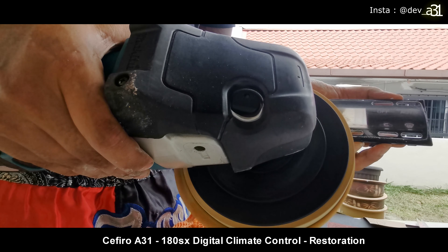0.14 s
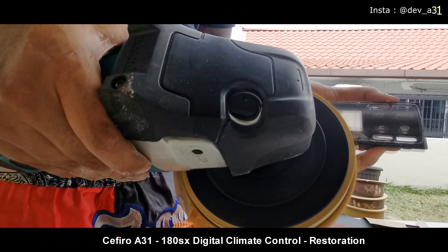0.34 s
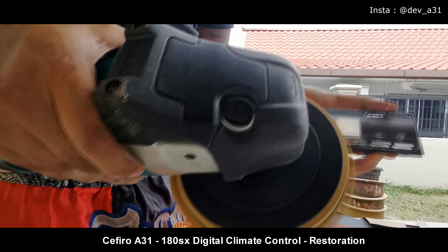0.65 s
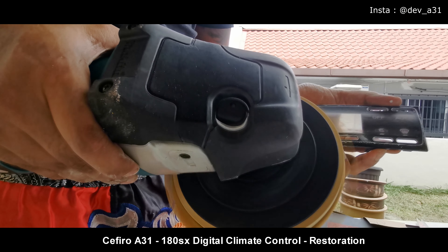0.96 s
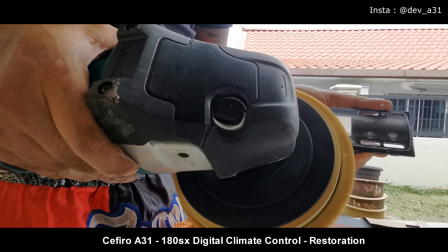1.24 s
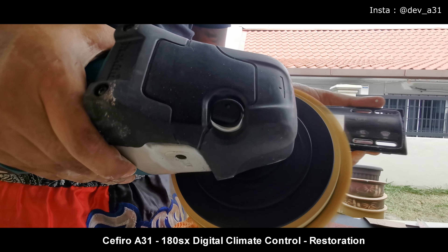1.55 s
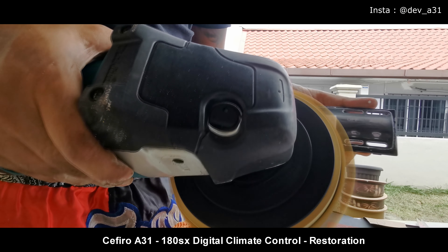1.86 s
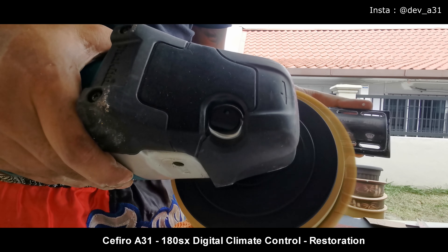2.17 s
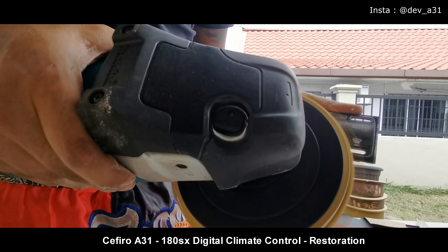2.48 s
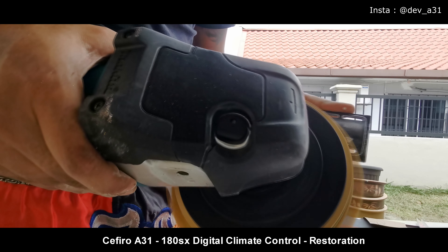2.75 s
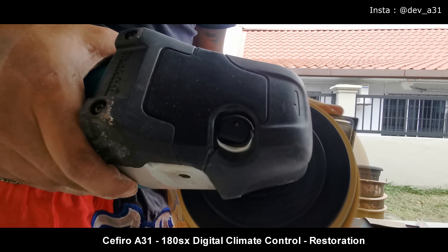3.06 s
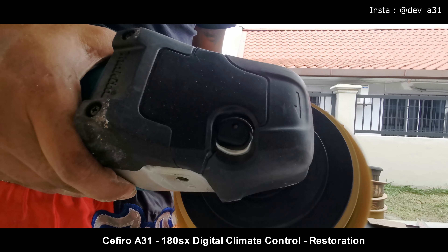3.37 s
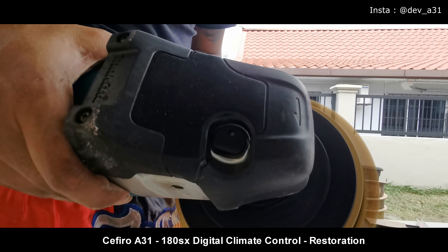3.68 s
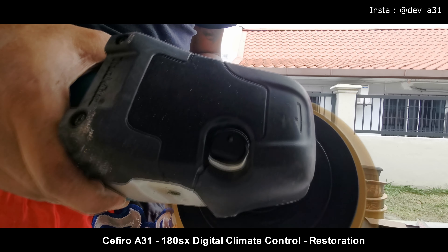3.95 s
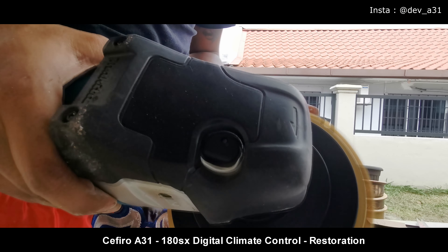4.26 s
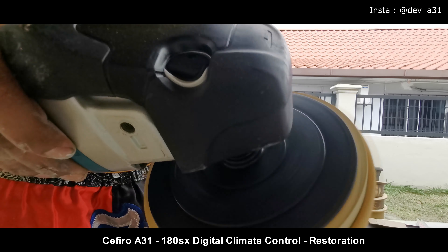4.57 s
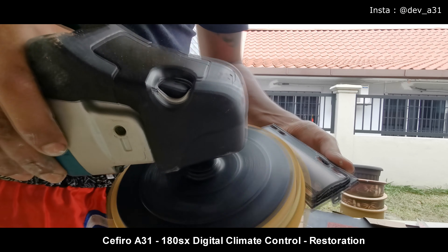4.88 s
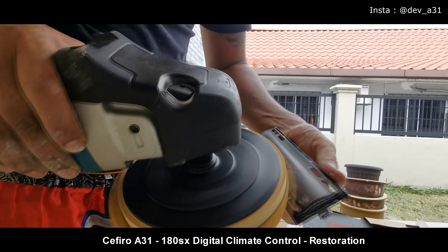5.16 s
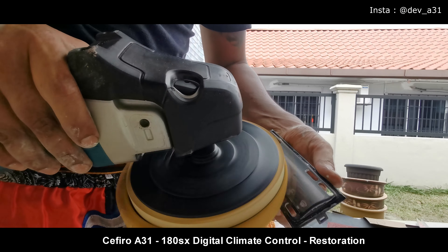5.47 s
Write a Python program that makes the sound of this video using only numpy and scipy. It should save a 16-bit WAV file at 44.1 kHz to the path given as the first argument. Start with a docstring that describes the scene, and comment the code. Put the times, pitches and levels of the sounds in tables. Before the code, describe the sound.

Heard very close in the open air, a rotary polisher runs throughout, mixing a high motor whine, a buzzing gear rattle and a sharp fan hiss above a faint hum. The pitch wavers a little as the pad presses on plastic. Near the middle the tool is raised for a moment, leaving mostly hiss and a slightly higher whine, then the rattle returns and the polishing carries on evenly.

```python
"""Outdoors, a hand's width from an electric rotary polisher buffing a plastic panel.
Under load its bevel gear sings and rattles in the gear head. The commutator whines,
the fan hisses through the vents and the shaking body drones. Midway the pad is lifted:
the motor speeds up, the gear falls quiet, and the tool comes down again tilted."""
import sys
import numpy as np
from scipy import signal
from scipy.fft import rfft, irfft, next_fast_len
from scipy.io import wavfile
from scipy.ndimage import uniform_filter1d

SR = 44100
rng = np.random.default_rng(int(sys.argv[2]) if len(sys.argv) > 2 else 0)


def inscribe(sig):
    """Save sig as 16-bit PCM at rate SR to the path in sys.argv[1].

    A 1-D sig is mono; a 2-D sig holds one channel per row.
    Samples are clipped to [-1, 1] before scaling.
    """
    pcm = np.round(np.clip(np.atleast_2d(sig).T, -1, 1) * 32767)
    wavfile.write(sys.argv[1], SR, pcm.astype(np.int16))


N = 429093
TIME_S = np.arange(N) / SR
PINION_TEETH, GEAR_RATIO, COMMUTATOR_BARS = 6, 8.65, 24
MAINS_HZ, WORKING_RPS = 50, 82   # rps: motor turns per second


def from_db(db):
    """Decibels to amplitude."""
    return 10 ** (np.asarray(db) / 20)


def unit_rms(x):
    """Scale to rms 1."""
    return x / np.sqrt(np.mean(np.abs(x) ** 2) + 1e-20)


def curve(rows):
    """(time, value) rows interpolated to every sample."""
    return np.interp(TIME_S, *np.transpose(rows))


def drift(corner_hz):
    """Slow noise of rms 1: coarse draws through a double one-pole low-pass."""
    step, warmup = 40, 2000
    pole = np.exp(-2 * np.pi * corner_hz * step / SR)
    white = rng.standard_normal(N // step + warmup + 2)
    slow = signal.lfilter([1], [1, -2 * pole, pole * pole], white)[warmup:]
    return np.interp(np.arange(N) / step, np.arange(len(slow)), unit_rms(slow))


def coloured(white, spectrum, column):
    """White noise shaped to one density column of a spectrum."""
    size, spectrum = next_fast_len(N), np.array(spectrum)
    hz = np.maximum(np.fft.rfftfreq(size, 1 / SR), 1)
    gain = from_db(np.interp(np.log(hz), np.log(spectrum[:, 0]), spectrum[:, column]))
    gain *= np.minimum(hz / spectrum[0, 0], 1) ** 2
    return irfft(rfft(white, size) * gain, size)[:N] * np.sqrt(SR / 2)


def ring(drive, hz, width_hz):
    """Steep-skirted resonance; complex, rms 1."""
    pole = np.exp((-np.pi * width_hz + 2j * np.pi * hz) / SR)
    return unit_rms(signal.lfilter([1], [1, -2 * pole, pole * pole], drive + 1e-18))


def phasor(cycles):
    """Complex sine of amplitude 1."""
    return np.exp(2j * np.pi * cycles)


# Tool shake and pad-stirred air: (frequency [Hz], left [rel. dB/Hz], right [rel. dB/Hz])
RUMBLE_SPECTRUM = [(25, -75, -77), (40, -73, -68), (55, -68, -66), (75.4, -76, -70.5), (96, -63.5, -66.5),
                   (119, -75, -68.5), (162, -70, -69.5), (300, -76, -72), (447, -78, -76.5),
                   (700, -86, -85.5)]
# Body drones: (frequency [Hz], width [Hz], level [dB])
BODY_DRONES = [(53, 14, -59), (92.4, 19, -59), (165, 31, -61.5), (244, 23, -61), (389, 17, -56.5)]
# Hums that swell and fade: (time [s], length [s], frequency [Hz], level [dB])
HUM_SWELLS = [(.3, 1, 165, -50.5), (.6, 1, 214.5, -48.5), (2.1, 0.79, 208, -49.5), (2.175, 0.34, 89, -43),
              (3.55, 0.84, 162, -50.5), (4.364, 0.17, 138, -41.5)]


def body(spread, rumble_db):
    """The shaking tool drones over a soft rumble, mostly common to both channels."""
    mid, side = rng.standard_normal((2, N))
    left = coloured(mid + spread * side, RUMBLE_SPECTRUM, column=1)
    right = coloured(mid - spread * side, RUMBLE_SPECTRUM, column=2)
    drones = np.zeros(N)
    for hz, width_hz, db in BODY_DRONES:
        drones += from_db(db) * ring(rng.standard_normal(N), hz, width_hz).real
    for at_s, length_s, hz, db in HUM_SWELLS:
        swell = np.exp(-2 * ((TIME_S - at_s) / length_s) ** 2)
        drones += from_db(db) * swell * ring(rng.standard_normal(N), hz, width_hz=18.4).real
    return from_db(rumble_db) * np.array([left, right]) + np.sqrt(2) * drones


# Vent resonances: (upright [Hz], tilted [Hz], width [Hz], upright [dB], tilted [dB], bright change [dB])
VENT_RESONANCES = [(11040, 10640, 660, -24.5, -25.3, -2), (12950, 12130, 700, -32.5, -42, 8.5)]
# Spells of brighter hiss: (start [s], end [s])
BRIGHT_SPELLS = [(4.45, 5), (7.15, 8.5)]


def vent_jets(tilt, wander_hz=59.9, swing_hz_s=220, wander_db=0.4, fade_s=0.17):
    """Air sings at the vent slots in noise bands that swing while the tool is being tilted."""
    bright = sum(np.clip(np.minimum(TIME_S - start_s, end_s - TIME_S) / fade_s + 0.5, 0, 1)
                 for start_s, end_s in BRIGHT_SPELLS)
    tilt_per_s = uniform_filter1d(np.abs(np.gradient(tilt)) * SR, size=SR // 10)
    base_hz, jets = 1000, np.zeros(N)
    for upright_hz, tilted_hz, width_hz, upright_db, tilted_db, bright_db in VENT_RESONANCES:
        hz = upright_hz + (tilted_hz - upright_hz) * tilt
        hz += wander_hz * drift(0.7) + swing_hz_s * tilt_per_s * drift(3)
        db = upright_db + (tilted_db - upright_db) * tilt + bright_db * bright + wander_db * drift(0.7)
        band = ring(rng.standard_normal(N), base_hz, width_hz)
        shifted = band * phasor(np.cumsum(hz - base_hz) / SR)
        jets += from_db(db) * unit_rms(shifted.real)
    return jets


# Cooling air: (frequency [Hz], left [dB/Hz], right [dB/Hz])
RUSH_SPECTRUM = [(250, -100, -86), (570, -65, -86), (785, -74.5, -91), (950, -87, -72.5),
                 (1490, -70.5, -79), (2330, -65.5, -69.5), (3270, -72.5, -76.5), (5000, -67.5, -73.5),
                 (7200, -69, -66.5), (7400, -71, -67), (8400, -76, -83.5), (10550, -65, -81.5),
                 (12500, -79, -76), (15000, -71.5, -93)]
# Vent and brush hiss: (frequency [Hz], upright [rel. dB/Hz], tilted [rel. dB/Hz])
HISS_SPECTRUM = [(7300, -104, -92), (7960, -62, -66), (8530, -65.5, -60), (9130, -58, -60.5),
                 (9400, -62, -59.5), (9530, -57.5, -56.5), (10100, -60.5, -60.5), (10500, -57.5, -63),
                 (11200, -58, -56.5), (12000, -59.5, -55.5), (12500, -59.5, -57), (13250, -61.5, -60),
                 (13900, -70, -67), (15800, -75, -72)]


def fan(turns, speed_rps, tilt, hiss_db, flutter_db, chop_db):
    """Cooling air rushes broadly; the vents beam a hiss to the left that grows with motor speed."""
    white = rng.standard_normal((4, N))
    air = np.array([coloured(white[0], RUSH_SPECTRUM, column=1),
                    coloured(white[1], RUSH_SPECTRUM, column=2)])
    hiss = np.sqrt(1 - tilt) * coloured(white[2], HISS_SPECTRUM, column=1)
    hiss += np.sqrt(tilt) * coloured(white[3], HISS_SPECTRUM, column=2)
    flow_gain = (speed_rps / speed_rps.mean()) ** 3
    air[0] += flow_gain * (from_db(hiss_db) * hiss + vent_jets(tilt))
    return air * from_db(flutter_db * drift(28) + chop_db * phasor(turns).real)


def reflections(direct, tilt, echo_db, tilt_stretch, sway):
    """Short echoes off hand, panel and housing comb the hiss differently as the tool moves."""
    samples, out, echo_gain = np.arange(N), direct.copy(), from_db(echo_db)
    for channel, path_scale in enumerate((1, 8 / 7)):
        for base_s in (0.0013, 0.0022, 0.0031, 0.0046):
            delay_s = base_s * path_scale * (1 + tilt_stretch * tilt + sway * drift(0.2))
            echo = np.interp(samples - np.round(delay_s * SR), samples, direct[channel])
            out[channel] -= echo_gain * echo
    return out / np.sqrt(1 + 4 * echo_gain ** 2)


# Whine: (bar-rate harmonic, upright [rel. dB], tilted [rel. dB], lifted [rel. dB],
# slack slope [dB/rps], right offset [dB])
WHINE_HARMONICS = [(1, -39.5, -42, -36.5, 7, -12.5), (2, -37, -46, -38, -0.5, -7.5),
                   (3, -48.5, -49.5, -50, -3, -3.5)]
# Thin whistle at 4 x bar rate: (time [s], level [rel. dB])
WHISTLE_LEVEL = [(0, -42), (1.34, -47), (1.9, -58), (4.1, -60), (4.48, -33.5), (5.6, -57), (7.07, -57),
                 (7.3, -44), (8.2, -41), (8.6, -58), (9.73, -57)]


def commutator(turns, slack_rps, tilt, contact, whistle_right_db, runout, waver_db, smear_cycles):
    """Bars pass the brushes: three harmonics and a thin whistle, each throbbing once a turn."""
    lines = [(4, curve(WHISTLE_LEVEL), whistle_right_db)]
    for harmonic, upright_db, tilted_db, lifted_db, slack_slope, right_db in WHINE_HARMONICS:
        working_db = upright_db + (tilted_db - upright_db) * tilt + slack_slope * np.minimum(slack_rps, 1)
        lines.append((harmonic, lifted_db + (working_db - lifted_db) * contact, right_db))
    throb = 1 + runout * phasor(turns)
    whine = np.zeros((2, N))
    for harmonic, db, right_db in lines:
        line = throb * phasor(harmonic * (COMMUTATOR_BARS * turns + smear_cycles * drift(38)))
        gain = np.sqrt(2) * from_db(db + waver_db * drift(10))
        whine += gain * line.real * from_db([[0], [right_db]])
    return whine


# Brief losses of grip: (time [s], half-width [s], dip [dB])
PAD_SLIPS = [(5.262, .016, -9), (5.67, .022, -2.5), (9.611, 0.012, -4.5)]


def pad_contact_db(lift_s, release_s, land_s, attack_s, settle_s, settle_db, lifted_db):
    """Pad drag on the gear: dies at the lift, returns lightly on landing, then is pressed home."""
    release = np.exp(-np.maximum(TIME_S - lift_s, 0) / release_s)
    landed_s = np.maximum(TIME_S - land_s, 0)
    landing = np.minimum(landed_s / attack_s, 1) * from_db(settle_db * np.exp(-landed_s / settle_s))
    slips_db = sum(db * np.exp(-((TIME_S - at_s) / half_s) ** 2) for at_s, half_s, db in PAD_SLIPS)
    return 20 * np.log10(np.hypot(release + landing, from_db(lifted_db))) + slips_db


def tooth_force(turns, slack_rps, mains_db, pad_db, lobe_db, uneven_db):
    """Force of rms 1, pulsing with each mains half wave, motor turn and turn of the uneven pad."""
    throb_db = -0.6 + 4.6 * np.minimum(slack_rps, 1.5)
    mains = phasor(2 * MAINS_HZ * TIME_S).real
    pulsing = from_db(mains_db * mains + throb_db * phasor(turns).real)
    pulsing /= np.sqrt(uniform_filter1d(pulsing ** 2, size=SR // 10))   # chatter adds no energy
    pad_rad = 2 * np.pi * turns / GEAR_RATIO + 0.75 * drift(0.21)   # contact shifts around the pad
    wobble_db = pad_db * np.cos(pad_rad) + lobe_db * np.cos(2 * pad_rad - 1.2)
    return unit_rms(pulsing * from_db(wobble_db + uneven_db * drift(12)))


def radiate(parts, patterns, tilt):
    """Each vibration reaches left and right with its own levels and lag, blended by tilt."""
    parts, poses = np.array(parts, np.complex64), []
    for left_db, right_db, lag_rad in np.transpose(patterns).reshape(2, -1, len(parts)):
        gains = np.array([from_db(left_db), from_db(right_db) * np.exp(-1j * lag_rad)], np.complex64)
        poses.append(np.sqrt(2) * (gains @ parts).real)
    upright, tilted = poses
    return (1 - tilt) * upright + tilt * tilted


# Gear tones: (motor order, then upright and tilted each: left [rel. dB], right [rel. dB], right lag [rad])
GEAR_ORDERS = [(6, -36, -45.5, 0, -37.5, -45.5, 0.24), (7, -38.5, -46, 2, -44.5, -52.5, 0.28),
               (8, -41, -54, 2, -52.5, -67, .6), (12, -44, -33, 4.5, -39.5, -35, 2.98),
               (13, -66, -80, -2, -45.5, -48, 3.7), (17, -36.5, -38.5, 1.3, -31, -31.5, 2.25),
               (18, -31, -52, 4, -22, -31.5, 3.6), (30, -31, -39, 1.3, -37.5, -41, 1.87),
               (33, -43, -50, 1, -38, -54, 1.2), (39, -37, -54, -2, -50, -58, 0.94)]
# Overtones that sing under pressure: (motor order, sag slope [dB/rps], slack slope [dB/rps])
PRESSURE_OVERTONES = [(12, 2.8, -2), (18, 3, -4.5)]


def gear_tones(turns, force, load_db, sag_rps, slack_rps, tilt, waver_db, smear_cycles):
    """Tooth-rate harmonics, with side tones from the slightly eccentric pinion."""
    drive = unit_rms(force ** 0.95)   # tones follow the force less closely than blows do
    pressure_db = {order: sag_slope * sag_rps + slack_slope * np.minimum(slack_rps, 1.4)
                   for order, sag_slope, slack_slope in PRESSURE_OVERTONES}
    parts = []
    for order, *_ in GEAR_ORDERS:
        gain = drive * from_db(load_db + pressure_db.get(order, 0) + waver_db * drift(28))
        parts.append(gain * phasor(order * turns + smear_cycles * drift(18)))
    return radiate(parts, np.array(GEAR_ORDERS)[:, 1:], tilt)


# Gear head modes: (frequency [Hz], width [Hz],
# then upright and tilted each: left [rel. dB], right [rel. dB], right lag [rad])
GEAR_HEAD_MODES = [(592, 400, -42, -41.5, 0, -45.5, -43, -2), (692, 363, -35.5, -55, -6, -38, -48, -5),
                   (917, 190, -47.5, -55, 6, -44, -62, 10.5), (998, 320, -39.5, -36, 3.5, -42.5, -38.5, 3),
                   (1363.5, 164, -26.5, -34.5, 1.47, -27.5, -42.5, 4),
                   (1473, 77, -30, -63.5, -1, -24.0, -33, 3.5),
                   (1579, 110, -48, -35, 5.5, -29.5, -32.5, 3.5),
                   (1946, 240, -26.5, -39.5, 2, -39.5, -33, 3.5),
                   (2127, 356, -27, -30.5, 1.5, -27, -53, -8),
                   (2260, 290, -56.0, -43, 2, -29.5, -32.5, 3.5),
                   (2538, 186, -30, -28.5, 0.9, -27, -31, 2.5), (2747, 400, -31, -34, 0.7, -31, -32.5, 2.5),
                   (3087, 170, -31, -41.5, -1.5, -63, -37.5, 3),
                   (3413, 200, -35, -35.5, 2, -34.5, -52.5, 3), (3924, 770, -32.5, -49, 2, -45.5, -36, 3),
                   (4570, 390, -38.5, -35.5, 2.5, -42.5, -47, -1.5)]
# Unloaded teeth rattling through their play: (time [s], level [dB re full load])
BACKLASH_SURGES = [(4.395, -6), (4.605, -8), (4.705, -14), (4.735, -11), (4.85, -17), (4.94, -9),
                   (5.055, -13), (5.115, -10), (5.16, -13)]


def gear_rattle(turns, force, load_db, tilt, scatter_db, mode_spread_db, jitter_s, scrape, surge_s):
    """Each tooth lands early or late and rings the gear head; the flanks slide between blows."""
    hits = np.flatnonzero(np.diff(np.floor(turns * PINION_TEETH)))
    strength, timing = rng.standard_normal((len(hits), 2)).T
    blows = force[hits] * from_db(scatter_db * strength)
    hits = np.clip(hits + np.round(jitter_s * SR * timing).astype(int), 0, N - 1)
    backlash = sum(from_db(db) * np.exp(-((TIME_S - at_s) / surge_s) ** 2)
                   for at_s, db in BACKLASH_SURGES)
    load, parts = from_db(load_db) + backlash, []
    for hz, width_hz, *_ in GEAR_HEAD_MODES:
        clicks = np.zeros(N)
        clicks[hits] = blows * (1 + from_db(mode_spread_db) * rng.standard_normal(len(hits)))
        sliding = scrape * force * rng.standard_normal(N)
        parts.append(load * ring(unit_rms(clicks) + sliding, hz, width_hz))
    rattle = radiate(parts, np.array(GEAR_HEAD_MODES)[:, 2:], tilt)
    highpass = signal.butter(2, 230, "high", fs=SR, output="sos")   # the rattle stays above the bass
    return signal.sosfilt(highpass, rattle)


# Motor speed, sagging under pad pressure: (time [s], speed [rps])
MOTOR_SPEED = [(0.26, 82.43), (0.38, 83.47), (0.92, 83.39), (1.08, 82.64), (2.72, 81.44), (4.02, 82.46),
               (4.22, 81.67), (4.44, 86.61), (4.7, 84.65), (5.14, 84.94), (5.34, 82.99), (5.76, 81.39),
               (6.16, 82.8), (6.32, 81.81), (8.4, 81.98), (8.6, 80.25), (8.9, 81.38), (9.42, 81.08),
               (9.66, 84.01)]
# Tool pose: (time [s], tilt [0 upright .. 1 tilted])
TOOL_TILT = [(0, 0.1), (4.4, 0), (5.1, 0.89), (9.73, 0.97)]


def scene():
    """Motor speed, pad contact and tilt drive the gear, commutator and fan over the body's drone."""
    speed_rps, tilt = curve(MOTOR_SPEED), curve(TOOL_TILT)
    turns = np.cumsum(speed_rps * (1 + 0.0008 * drift(6))) / SR
    sag_rps = WORKING_RPS - speed_rps
    # Slack: the motor outruns a lightly pressed pad; near 0 under firm pressure.
    knee_rps, softness_rps, slack_db_per_rps = 0.38, 0.22, -1.34
    slack_rps = softness_rps * np.logaddexp(0, (-sag_rps - knee_rps) / softness_rps)
    contact_db = pad_contact_db(lift_s=4.3, release_s=0.055, land_s=5.16, attack_s=0.024,
                                settle_s=0.22, settle_db=-1.5, lifted_db=-21)
    load_db = contact_db + slack_db_per_rps * slack_rps
    force = tooth_force(turns, slack_rps, mains_db=2, pad_db=0.7, lobe_db=0.76, uneven_db=0.5)
    rattle = gear_rattle(turns, force, load_db, tilt, scatter_db=0.8, mode_spread_db=-3.5,
                         jitter_s=0.00019, scrape=0.6, surge_s=0.0089)
    singing = gear_tones(turns, force, load_db, sag_rps, slack_rps, tilt,
                         waver_db=1.38, smear_cycles=0.031)
    whine = commutator(turns, slack_rps, tilt, from_db(contact_db), whistle_right_db=-13,
                       runout=0.19, waver_db=1.4, smear_cycles=0.026)
    air = fan(turns, speed_rps, tilt, hiss_db=-1.56, flutter_db=0.47, chop_db=0.35)
    air = reflections(air, tilt, echo_db=-15, tilt_stretch=0.2, sway=0.012)
    drone = body(spread=0.24, rumble_db=-2)
    return drone + air + from_db(2.5) * whine + from_db(0.3) * singing + from_db(0.18) * rattle


def record(dry):
    """Steep low-pass at 15.9 kHz."""
    return signal.sosfilt(signal.ellip(12, 0.1, 80, 15900, fs=SR, output="sos"), dry)


dry = scene()
out = record(dry)
inscribe(out)
```